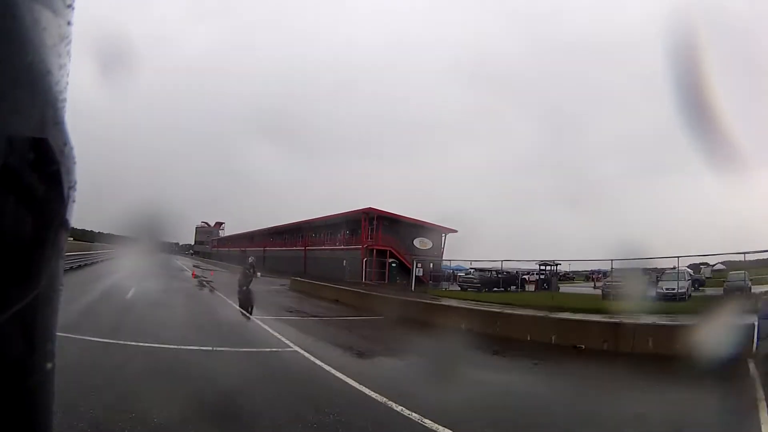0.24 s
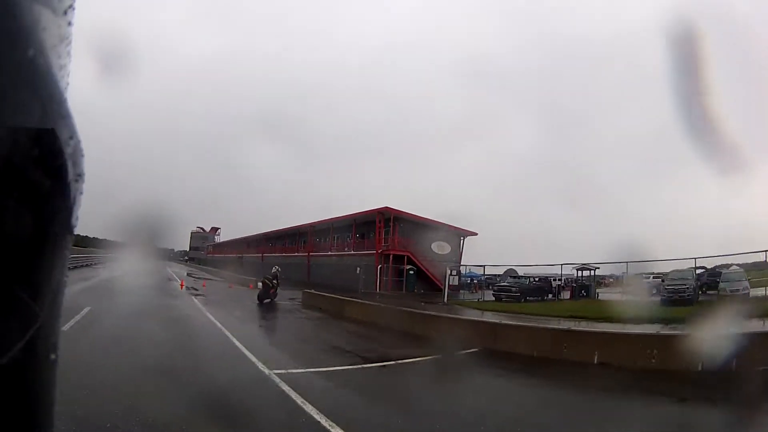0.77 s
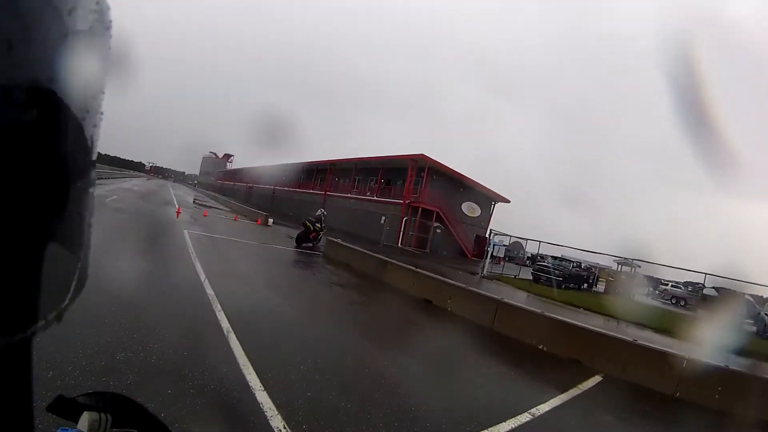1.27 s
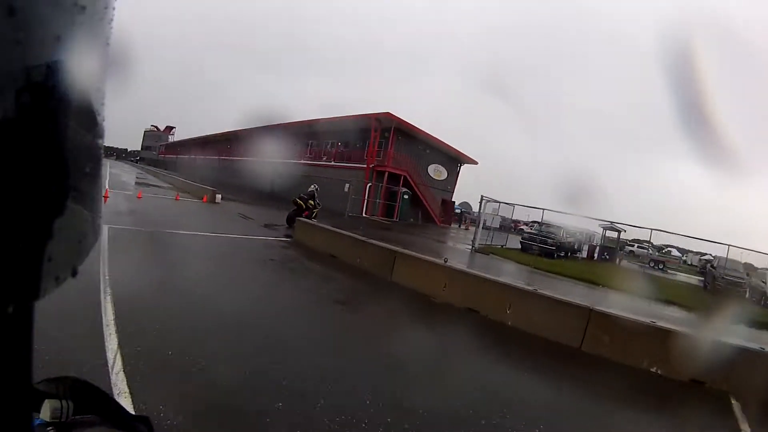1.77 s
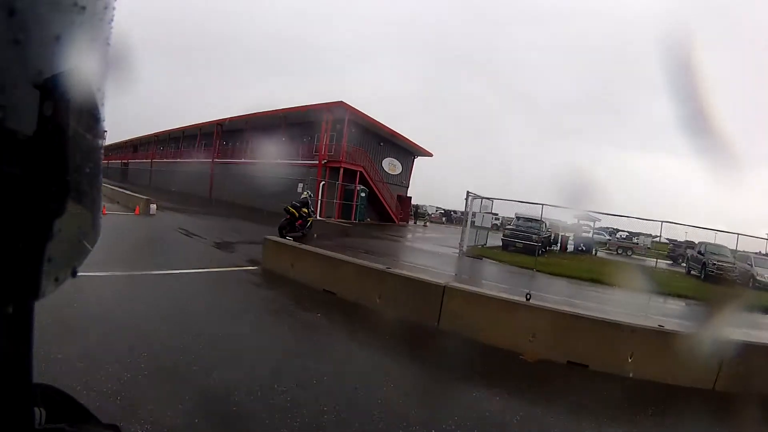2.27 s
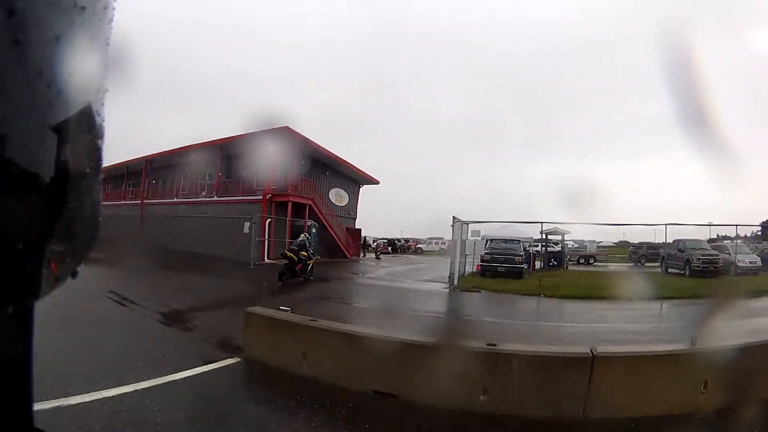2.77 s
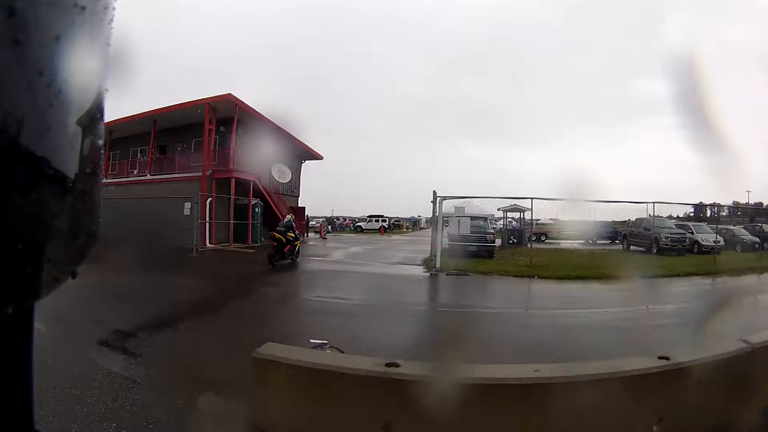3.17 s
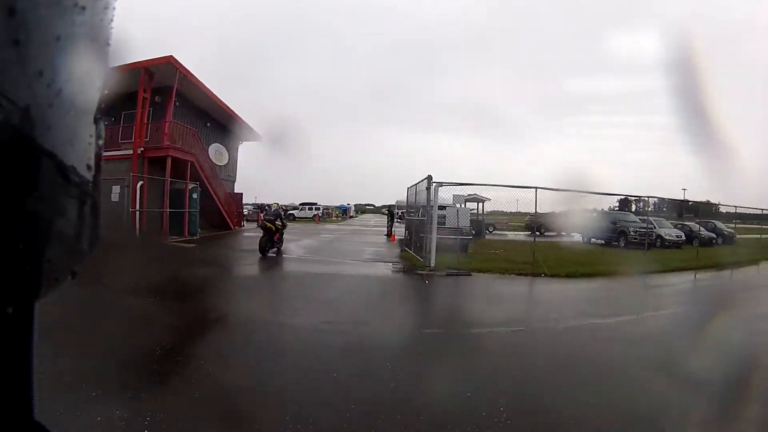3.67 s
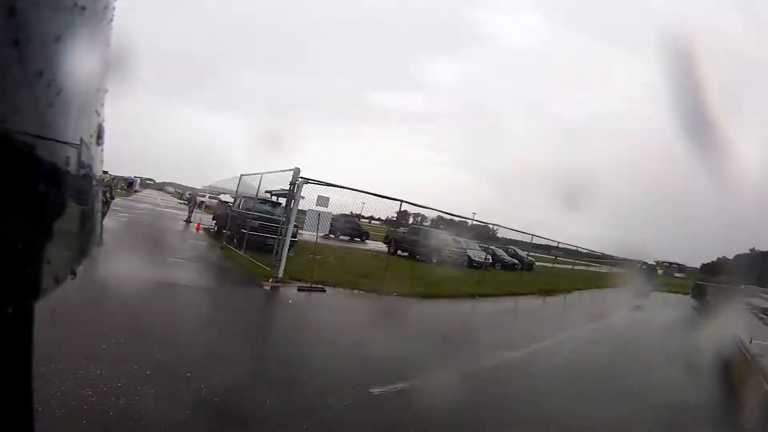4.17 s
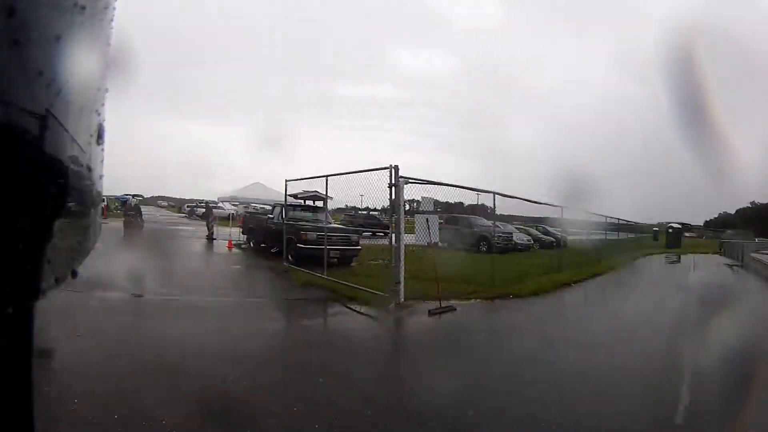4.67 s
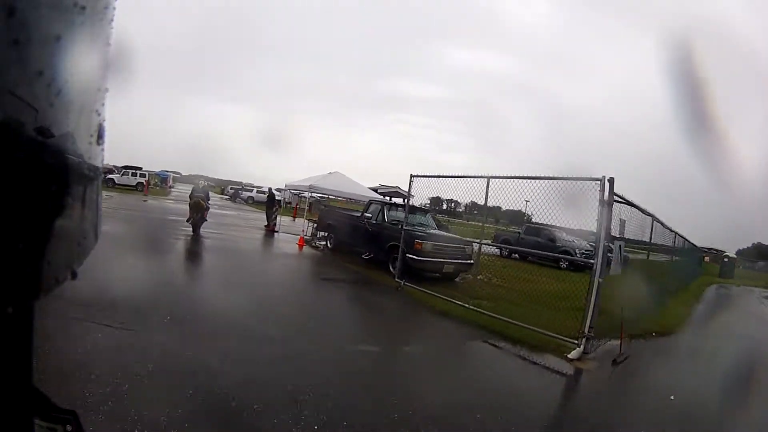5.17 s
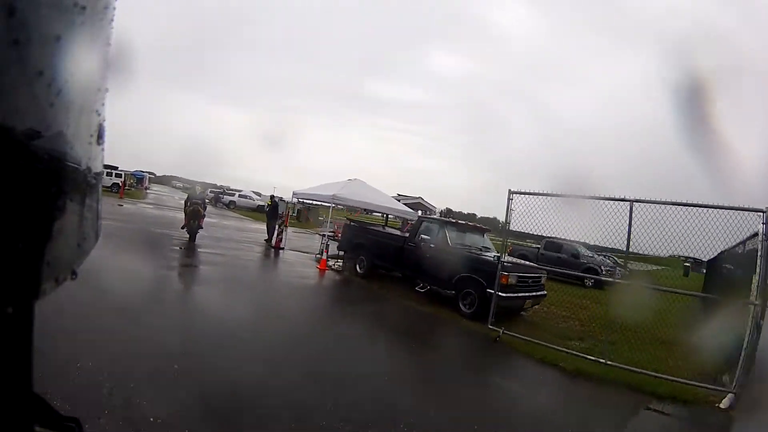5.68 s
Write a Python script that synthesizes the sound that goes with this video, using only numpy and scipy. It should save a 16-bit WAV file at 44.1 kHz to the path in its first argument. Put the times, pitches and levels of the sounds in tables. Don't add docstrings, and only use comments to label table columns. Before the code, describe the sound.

Close on a motorcycle in an outdoor wet pit lane, heard through a housed onboard camera microphone. A loud, falling exhaust drone pops and cracks around one second, with mount rattles. It fades to a lumpy near-idle with thin gear whine, then a short blip and a harder one, and two modest throttle pulls over spray hiss and wind buffeting.

```python
import sys
import numpy as np
from scipy import signal
from scipy.io import wavfile
from scipy.ndimage import uniform_filter1d

SR = 44100
rng = np.random.default_rng(int(sys.argv[2]) if len(sys.argv) > 2 else 0)


def to_wav(sig):
    pcm = np.clip(np.atleast_2d(sig), -1, 1) * 32767
    pcm = np.round(pcm).astype(np.int16)
    wavfile.write(sys.argv[1], SR, pcm.T)


def gain_from_decibels(decibels):
    exponent = np.asarray(decibels, float) / 20
    return 10 ** exponent


N = 261940


def evened(x):
    return x / np.sqrt(np.mean(x ** 2) + 1e-20)


def levelled(x):
    return x / np.sqrt(uniform_filter1d(x ** 2, size=SR // 5) + 1e-20)


def curves(rows):
    s, *columns = np.transpose(rows)
    return [np.interp(np.arange(N) / SR, s, c) for c in columns]


def spans(rows, ramp_s):
    t = np.arange(N) / SR
    return np.array([np.clip(np.minimum(t - row[0], row[1] - t) / ramp_s + .5, 0, 1) for row in rows])


def bump(at_s, width_s):
    return np.exp(-((np.arange(N) / SR - at_s) / width_s) ** 2)


def drift(step_s, count):
    knots = rng.standard_normal((150, count)).T
    return [np.interp(np.arange(N) / SR, np.arange(150) * step_s, k) for k in knots]


def add(mix, s, sound):
    part = mix[round(s * SR):][:len(sound)]
    part += sound[:len(part)]


def resonate(x, hz, width):
    turn = np.exp(2j * np.pi * np.cumsum(hz * np.ones(len(x))) / SR)
    r = np.exp(-np.pi * width / SR)
    return 2 * (turn * signal.lfilter([1 - r], [1, -r], x / turn)).real


def body(x, modes):
    return sum(gain_from_decibels(db) * resonate(resonate(x, hz, width), hz, width) for hz, width, db in modes)


def ring(db, hz, t60):
    t = np.arange(SR // 8) / SR
    onset = 1 - np.exp(-(t * hz * 2.2) ** 2)
    swing = onset * gain_from_decibels(-60 * t / t60) * np.sin(2 * np.pi * hz * t)
    return gain_from_decibels(db) * swing / abs(swing).max()


def noise(colour, patchy_db):
    hz = np.fft.rfftfreq(1024, 1 / SR)
    a, b, patches = rng.standard_normal((N // 256 + 5, 513, 3)).T
    patches = evened(uniform_filter1d(uniform_filter1d(patches, size=10, axis=0), size=10, axis=1))
    f, db = np.transpose(colour)
    shape_db = np.interp(np.log(hz + 1), np.log(f), db, left=-70, right=-70)[:, None]
    spectra = (a + 1j * b) * gain_from_decibels(shape_db + patchy_db * patches)
    return evened(signal.istft(spectra, nperseg=1024, noverlap=768)[1][:N])


def engine():
    # (time [s], rate [firings/s])
    speed = [(0, 89.7), (.7, 79.9), (1.15, 72.2), (1.7, 66.1), (2, 61.7), (2.3, 59), (2.78, 51),
             (2.95, 59.5), (3.05, 61.4), (3.19, 101), (3.66, 56), (3.8, 50), (4.1, 63.8), (4.42, 61.2),
             (4.78, 64.6), (5.32, 63.1), (5.43, 64.9), (5.94, 58.2)]
    cylinder_db = [1, -3.5, 0, -5]
    # (start [s], end [s], opening)
    openings = [
        (2.87, 3.02, .9),
        (3.07, 3.2, 1.7),
        (3.84, 4.52, .9),
        (4.74, 5.48, .9),
    ]
    # (start [s], end [s], roughness [0-1])
    loping = [
        (-.1, 1.02, .35),
        (1.02, 1.7, .5),
        (2.22, 2.86, .72),
        (3.67, 3.8, .75),
        (4.5, 4.76, .25),
        (5.5, 6, .75),
    ]
    # (time [s], outlet level [dB])
    effort = [(0, -48.5), (.85, -51), (1.16, -56.5), (1.27, -62), (1.71, -70.5), (1.96, -69.5),
              (2.7, -77.5), (2.86, -80), (2.89, -64), (2.99, -63), (3.045, -78), (3.09, -54), (3.195, -54),
              (3.24, -61), (3.52, -60.5), (3.64, -84), (3.8, -70), (4.05, -69)]
    shut_s, cruise_db, idle_db = 5.48, -67.5, -80
    smooth, uneven_db, jitter_cycles, puff_cycles = .2, 2.2, .028, .47

    hz, = curves(speed)
    turns = np.cumsum(hz) / SR
    effort_db, = curves([*effort, (shut_s, cruise_db), (shut_s + .05, idle_db)])
    throttle = np.array(openings)[:, 2] @ spans(openings, .018)
    rough = smooth + (np.array(loping)[:, 2] - smooth) @ spans(loping, .1)
    fast = np.interp(np.arange(N) / SR, [.9, 1.5], [1, 0])

    wander = jitter_cycles * evened(uniform_filter1d(rng.standard_normal(N), size=500))
    firing = np.maximum.accumulate((turns + wander).astype(int))
    size, excess = rng.uniform(-1, 1, (600, 2)).T * np.sqrt(3)
    strength = gain_from_decibels(np.resize(cylinder_db, 600) + uneven_db * size)[firing]
    kicks = np.diff(firing, prepend=0) * 1.
    kicks = uniform_filter1d(uniform_filter1d(kicks, size=20), size=20)
    puffs = evened(np.exp(-(turns % 1) / puff_cycles) * rng.standard_normal(N))

    orders = order_levels(hz, effort_db, throttle)
    boom = silencer(turns, orders, strength, excess[firing] * uniform_filter1d(kicks, size=40), puffs, rough)
    bark = outlet(strength, kicks, puffs, rough, fast, effort_db, throttle)
    return boom + bark + clatter(hz, turns, strength, fast, throttle)


def order_levels(hz, effort_db, throttle):
    # (frequency [Hz], level [dB])
    pipe = [(50, -71), (64, -57.5), (96, -55), (108, -62), (140, -58.5), (185, -54), (225, -64), (300, -63)]
    middling_db, waver_db = -60, 1.5
    f, pipe_db = np.transpose(pipe)
    share_and_open_db = [(.18, -6), (.86, 1.5), (.77, 3)]
    wavers = drift(.09, count=3)
    levels = []
    for k, ((share, open_db), waver) in enumerate(zip(share_and_open_db, wavers), 1):
        level_db = np.interp(np.log(k * hz), np.log(f), pipe_db)
        level_db = level_db + share * (effort_db - middling_db) + open_db * throttle
        levels.append(gain_from_decibels(level_db + waver_db * waver))
    return np.array(levels)


def silencer(turns, orders, strength, uneven_kicks, puffs, rough):
    # (frequency [Hz], width [Hz], level [dB])
    cavities = [
        (144, 43, -9.5),
        (195.5, 155, 7),
        (320, 69, 2),
    ]
    lag = .12
    hum = sum(np.sqrt(2) * level * np.cos(2 * np.pi * k * (turns - lag) - .9)
              for k, level in enumerate(orders, 1))
    hum *= levelled(uniform_filter1d(np.roll(np.sqrt(strength), -200), size=300))
    thud = levelled(body(evened(uneven_kicks) + .16 * puffs, cavities))
    steady = gain_from_decibels(1.5) * np.sqrt(1 - rough) * hum
    return steady + gain_from_decibels(.86) * np.sqrt(rough) * np.hypot(*orders[1:]) * thud


def outlet(strength, kicks, puffs, rough, fast, effort_db, throttle):
    # (frequency [Hz], width [Hz], level [dB])
    shut_modes = [(349, 113, 4), (453, 108, 3.5), (551, 71, 3.5), (720, 160, -17), (990, 340, -17.5)]
    # (frequency [Hz], width [Hz], level [dB])
    open_modes = [(310, 160, -2), (430, 150, -3), (550, 130, 1.5), (680, 150, -1), (790, 140, -3),
                  (1350, 250, -17)]
    rasp_db = 13.5 * bump(4.65, .17)
    drive = strength * (np.sqrt(1 - rough) * evened(kicks) + np.sqrt(rough) * .8 * puffs)
    bark = fast * levelled(body(drive, shut_modes)) + (1 - fast) * levelled(body(drive, open_modes))
    return gain_from_decibels(effort_db + 3.5 * throttle + rasp_db - .46) * bark


def clatter(hz, turns, strength, fast, throttle):
    # (frequency [Hz], level [dB per Hz])
    fast_colour = [(410, -24), (700, -9), (985, -8), (1230, -32), (1400, -31), (2070, -14), (2340, -21.5),
                   (2710, -16.5), (3170, -18), (3460, -30), (3770, -25), (5840, -28.5), (6840, -30.5),
                   (11000, -36.5), (12900, -46), (16800, -73), (22000, -120)]
    # (frequency [Hz], level [dB per Hz])
    slow_colour = [(410, -13.5), (700, -5.5), (791, -6), (1210, -11.5), (1320, -8), (1930, -13.5),
                   (2550, -11), (4000, -16), (4860, -20.5), (5840, -20), (7640, -29.5), (9990, -26),
                   (12900, -38), (16800, -67), (22000, -120)]
    gate, gate_decay = .31, .76
    hiss = np.sqrt(fast) * noise(fast_colour, patchy_db=1.65)
    hiss = hiss + np.sqrt(1 - fast) * noise(slow_colour, patchy_db=1.1)
    throb = evened(1 + gate * strength * np.exp(-(turns % 1) / gate_decay))
    running_db = 10 * np.log2(hz / 60) + .64 * throttle
    puddle_db = 1.4 * bump(5.0, .25)
    level_db = -66 + uniform_filter1d(running_db, size=3000) - 3 * fast + puddle_db
    return gain_from_decibels(level_db) * throb * hiss


def pops():
    # (time [s], peak level [dB], frequency [Hz], ring t60 [s], polarity)
    fuel_pops = [(.124, -29.5, 194, 0.03, -1), (0.4269, -29, 230, 0.013, 1), (0.53, -25.5, 238, 0.034, 1),
                 (0.64, -25.5, 234, 0.028, 1), (0.777, -30.5, 228, 0.032, 1), (0.868, -27.5, 224, 0.028, 1),
                 (0.895, -29, 234, 0.047, 1), (.9543, -12.5, 222, .036, -1), (.9552, -23, 70, .055, 1),
                 (.9555, -24, 450, .025, -1), (.9562, -29, 740, .02, 1), (0.988, -31, 258, 0.0063, 1),
                 (1.013, -38.5, 262, 0.015, 1), (1.202, -26.5, 195, 0.007, 1), (1.211, -26, 196, 0.058, 1),
                 (1.244, -34.5, 338, 0.052, 1), (1.2472, -26, 615, 0.0062, 1), (1.26, -34.5, 162, 0.019, 1),
                 (1.317, -42.5, 272, 0.088, -1), (1.485, -45, 241, 0.019, 1), (1.572, -43.5, 194, 0.17, 1),
                 (1.579, -42, 320, 0.033, 1), (1.768, -46.5, 198, 0.055, 1), (1.984, -46.5, 485, 0.013, 1)]
    out = np.zeros(N)
    for s, db, hz, t60, polarity in fuel_pops:
        add(out, s, np.sign(polarity) * ring(db, hz, t60))
    return out


def pings():
    # (time [s], peak level [dB], frequency [Hz], ring t60 [s])
    short_rings = [
        (.7955, -53, 3800, .012),
        (.9566, -42, 5570, .02),
        (.9572, -44, 4650, .015),
        (.9585, -42, 3250, .02),
        (.9575, -40, 1300, .015),
        (.957, -33, 570, .03),
        (.9562, -46, 7200, .01),
        (.958, -37, 1950, .03),
        (.9562, -52, 11800, .006),
        (.962, -21, 150, .04),
    ]
    out = np.zeros(N)
    for s, *shape in short_rings:
        add(out, s, ring(*shape))
    return out


def gear(rows, blur_hz):
    hz, db = curves(rows)
    start, end = rows[0][0], rows[-1][0]
    meshing = np.interp(np.arange(N) / SR, [start - .05, start, end, end + .058], [0, 1, 1, 0])
    shake, flutter = (evened(v) for v in uniform_filter1d(rng.standard_normal((N, 2)).T, size=300))
    whistle = np.sqrt(2) * np.sin(2 * np.pi * np.cumsum(hz + blur_hz * shake) / SR)
    return gain_from_decibels(db) * meshing * evened(gain_from_decibels(4.5 * flutter)) * whistle


def gears():
    # (time [s], frequency [Hz], level [dB])
    high_whine = [(1, 4700, -83), (1.3, 4470, -83), (1.34, 4430, -74), (1.65, 4190, -79), (2, 3900, -79),
                  (2.08, 3820, -75.5), (2.46, 3500, -76), (2.52, 3200, -81), (2.68, 2800, -84)]
    # (time [s], frequency [Hz], level [dB])
    low_whine = [(1.75, 1170, -72), (2, 1105, -72), (2.2, 1065, -73), (2.42, 1010, -73), (2.55, 980, -81)]
    return gear(high_whine, blur_hz=35) + gear(low_whine, blur_hz=10)


def rattles():
    # (time [s], peak level [dB], length [s], tilt [dB per octave])
    knocks = [(0.413, -56, 0.0055, -11), (0.546, -61, 0.0045, -14), (0.64, -44.5, 0.0085, -35),
              (0.866, -55, 0.014, -5), (0.895, -54, 0.012, 0), (.9562, -34, .004, 9), (.957, -30, .006, -1),
              (.9665, -44, .003, 4), (.9715, -48, .004, 4), (.82, -54, .004, -2), (0.989, -42, 0.0042, -39),
              (1.011, -44, 0.006, -18), (1.197, -46, .006, -4), (1.203, -39, .006, -4),
              (1.2085, -39, .003, 2), (1.2148, -27.5, .003, -3), (1.2205, -32, .004, -3),
              (1.227, -42, .004, -4), (1.235, -44, .004, -4), (1.2471, -26, .0018, -3),
              (1.2476, -41, .0015, 9), (1.2515, -36, .006, -3), (1.26, -38, .009, -7),
              (1.316, -39, .006, -6), (1.323, -40, .005, -6), (1.46, -50, 0.037, -8),
              (1.523, -47, 0.014, -9.5), (1.565, -39, 0.017, -6), (1.769, -51, 0.0068, -5),
              (1.786, -61, .005, -14)]
    # (frequency [Hz], width [Hz], level [dB])
    housing = [(520, 200, -7), (780, 250, -6), (1120, 250, -7), (1730, 220, 0), (2000, 220, -3),
               (2500, 400, 0), (3200, 450, -11), (4600, 800, -21), (5600, 800, -19), (8800, 2200, -29)]
    out, t = np.zeros(N), np.arange(2600) / SR
    contacts = rng.standard_normal((len(knocks), len(t)))
    for (s, db, length, tilt_db), grit in zip(knocks, contacts):
        burst = grit * abs(grit) * np.exp(-(t / length) ** 2 * 1.5)
        modes = [(hz, width, mode_db + tilt_db * np.log2(hz / 1700) - 10 * np.log10(width))
                 for hz, width, mode_db in housing]
        knock = body(burst, modes)
        add(out, s, gain_from_decibels(db) * knock / abs(knock).max())
    return out


def wind():
    # (time [s], level [dB])
    strength_rows = [(0, -87), (.5, -76), (.95, -54), (1.12, -72), (1.22, -56), (1.38, -61), (1.52, -58),
                     (1.72, -66.5), (2.1, -73.5), (2.35, -65), (2.6, -69), (2.9, -63), (3.25, -67),
                     (3.38, -67), (3.9, -61), (4.4, -65), (4.85, -64.5), (5.94, -64)]
    # (frequency [Hz], level [dB per Hz])
    colour = [(15, -14), (30, -21.5), (50, 1.5), (90, -3.5), (140, -3), (250, -9), (400, -19.5), (800, -32)]
    # (time [s], peak level [dB], frequency [Hz], ring t60 [s])
    gusts = [
        (4.073, -47, 59.7, 0.074),
        (4.521, -46, 90, 0.15),
        (4.572, -46, 80.4, 0.091),
        (4.824, -43.5, 54, 0.13),
        (4.864, -47, 70, 0.025),
    ]
    lumps_db = 2 * drift(.06, count=1)[0]
    level_db = curves(strength_rows)[0] + lumps_db
    out = gain_from_decibels(level_db + 8) * noise(colour, patchy_db=1.5)
    for s, *shape in gusts:
        add(out, s, -ring(*shape))
    return out


def scene():
    return (engine() + pops() + pings() + gears() + rattles() + wind())[None]


def roll_off(x):
    return signal.sosfilt(signal.butter(12, 13050, fs=SR, output="sos"), x)


def record(dry):
    mix = dry + gain_from_decibels(-90.5) * rng.standard_normal(dry.shape)
    return roll_off(mix)


dry = scene()
out = record(dry)
to_wav(out)
```